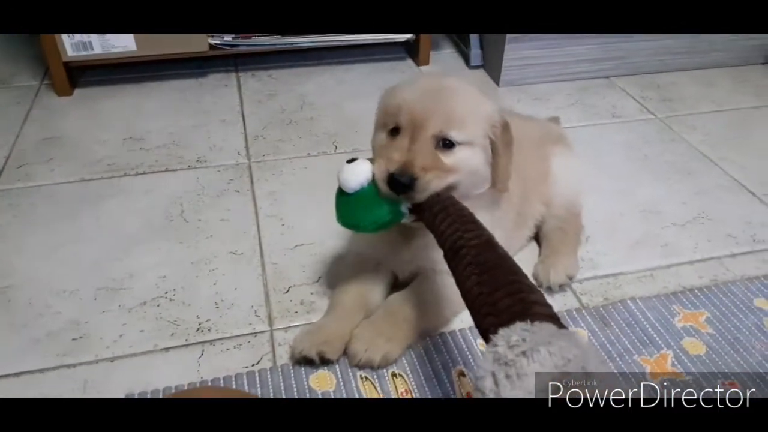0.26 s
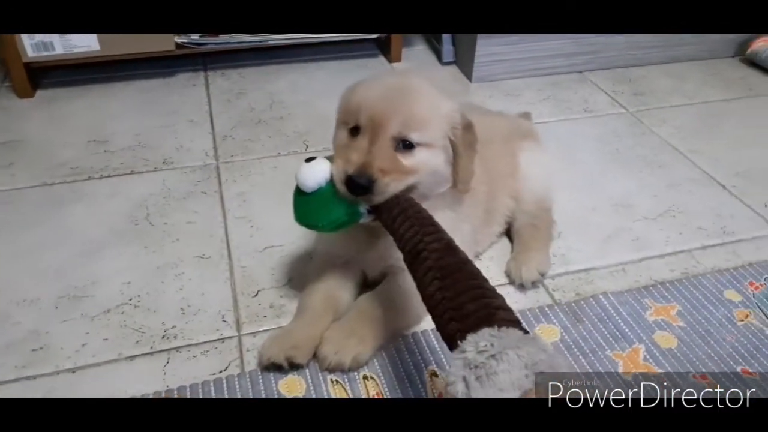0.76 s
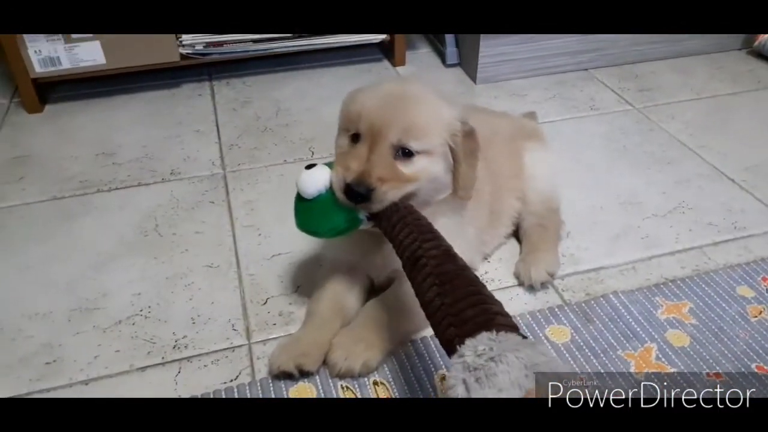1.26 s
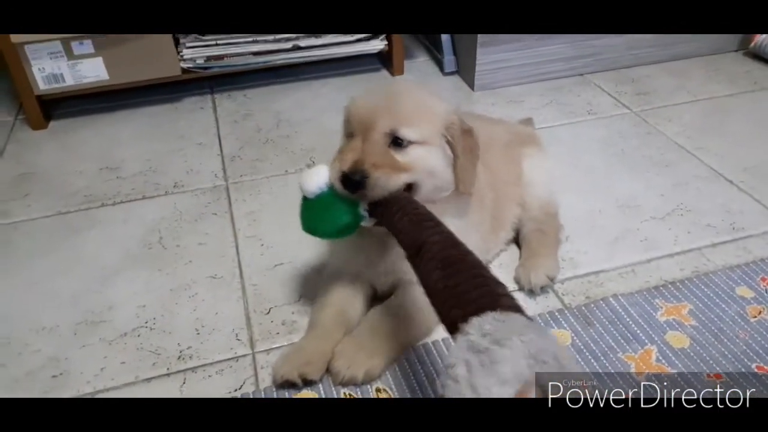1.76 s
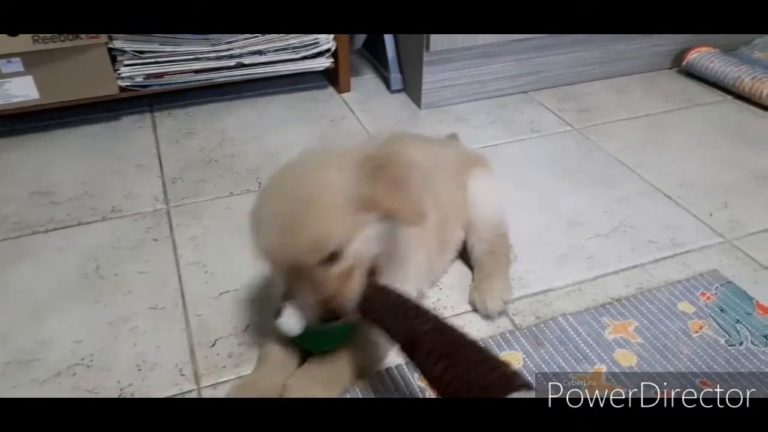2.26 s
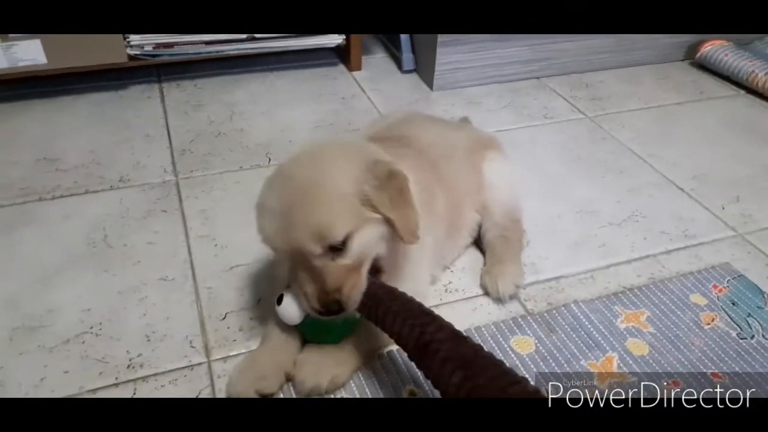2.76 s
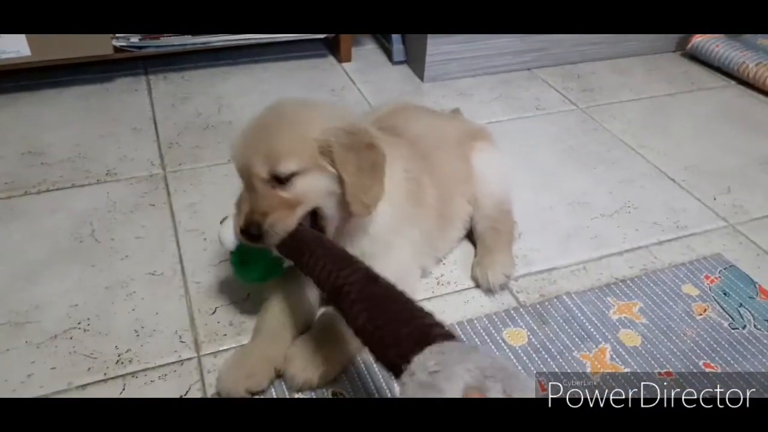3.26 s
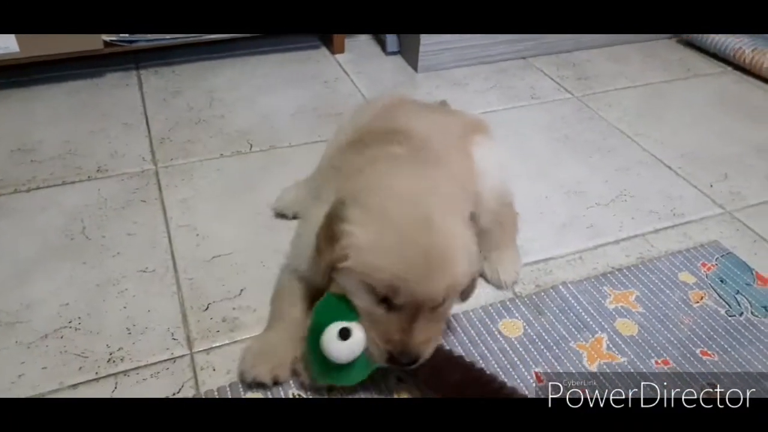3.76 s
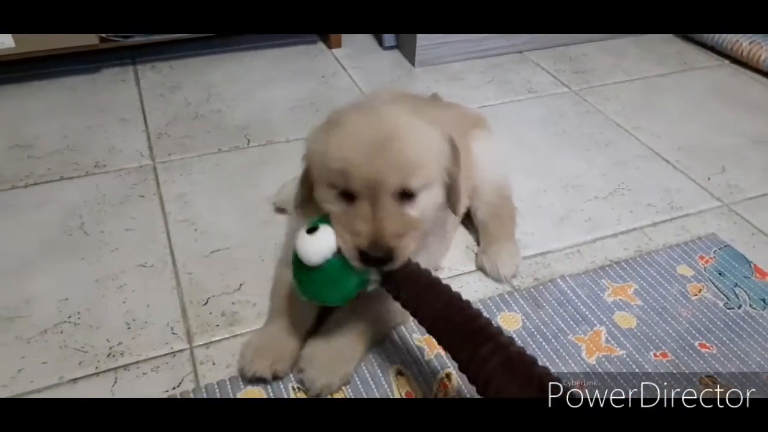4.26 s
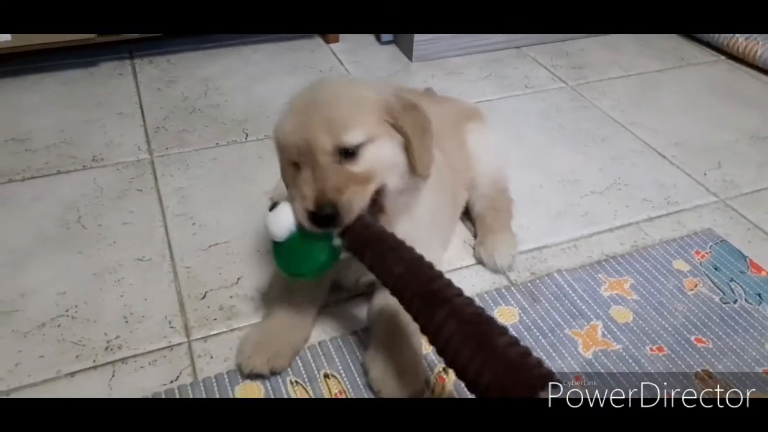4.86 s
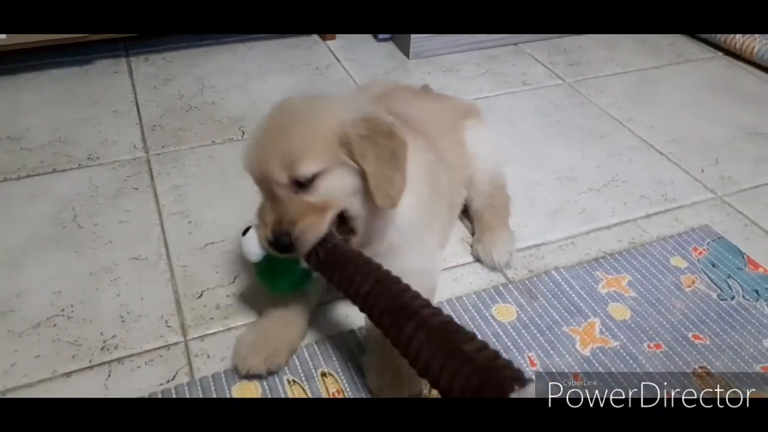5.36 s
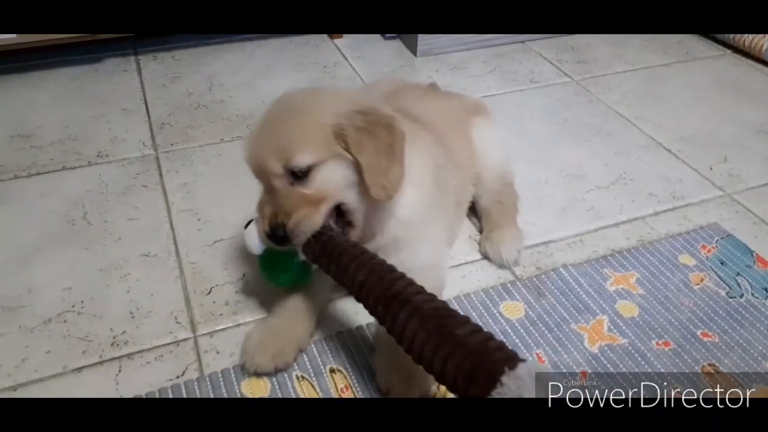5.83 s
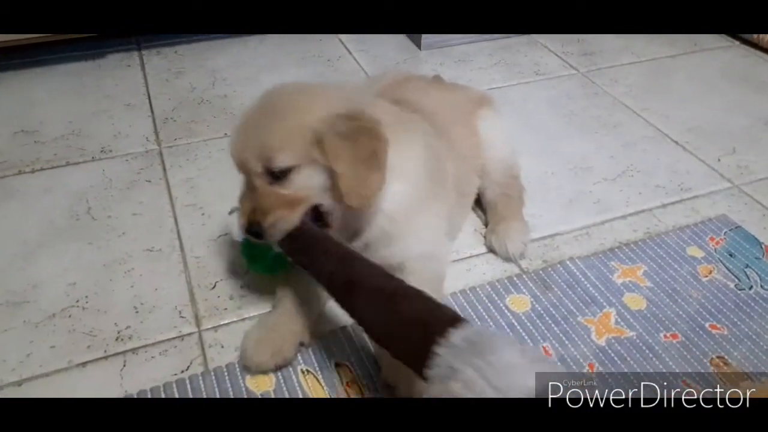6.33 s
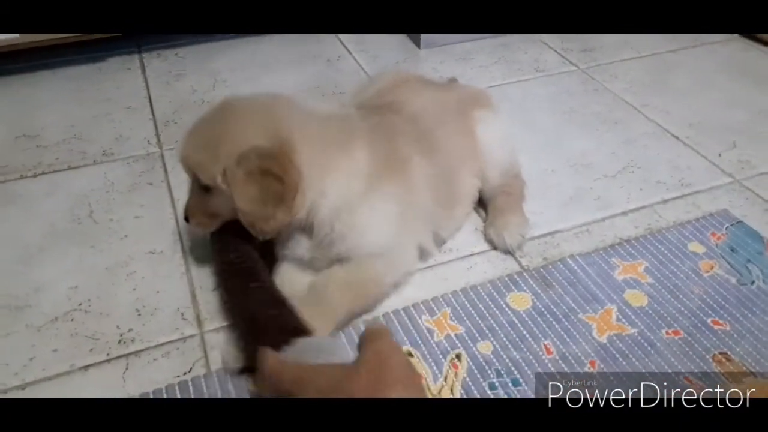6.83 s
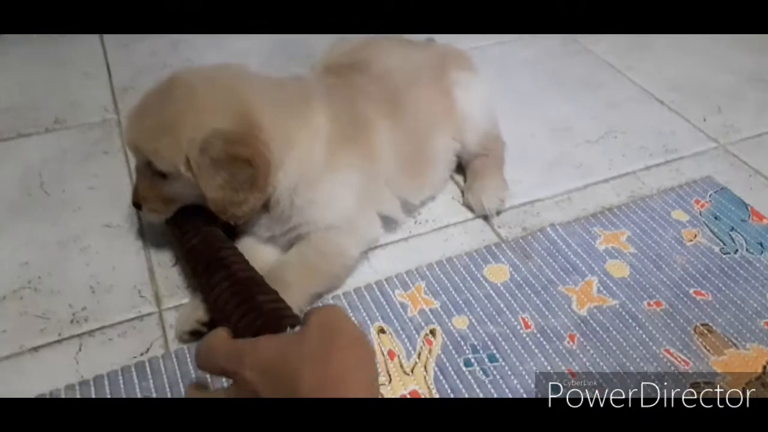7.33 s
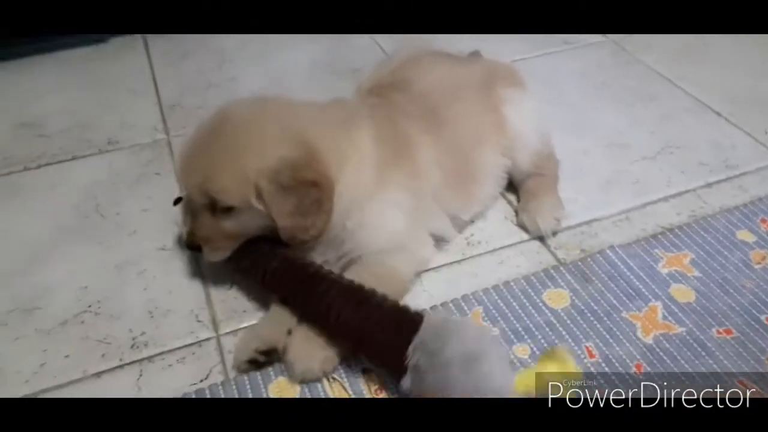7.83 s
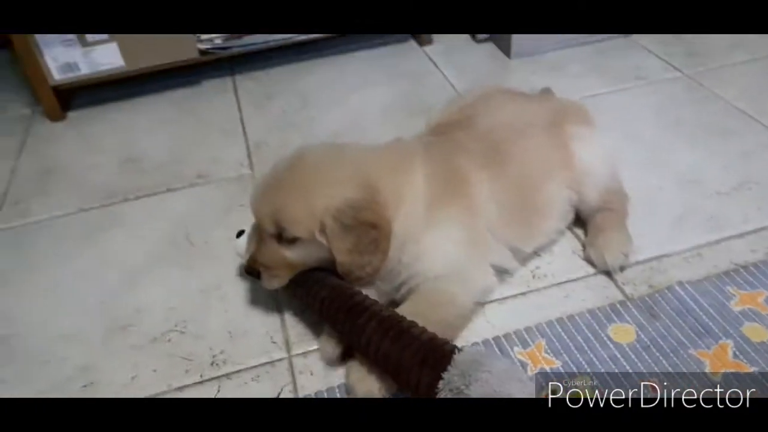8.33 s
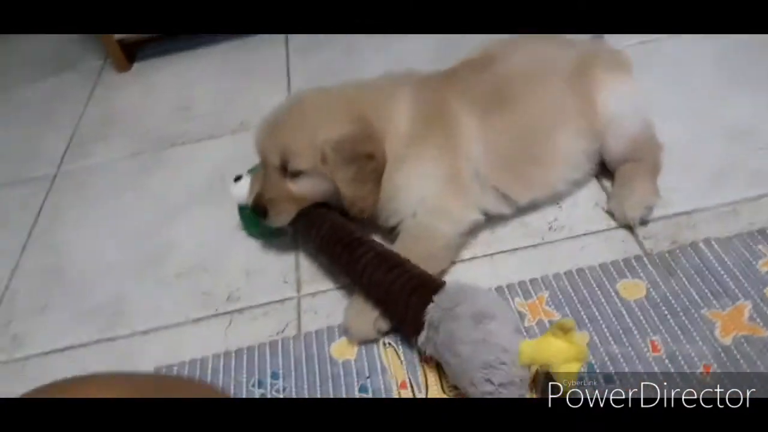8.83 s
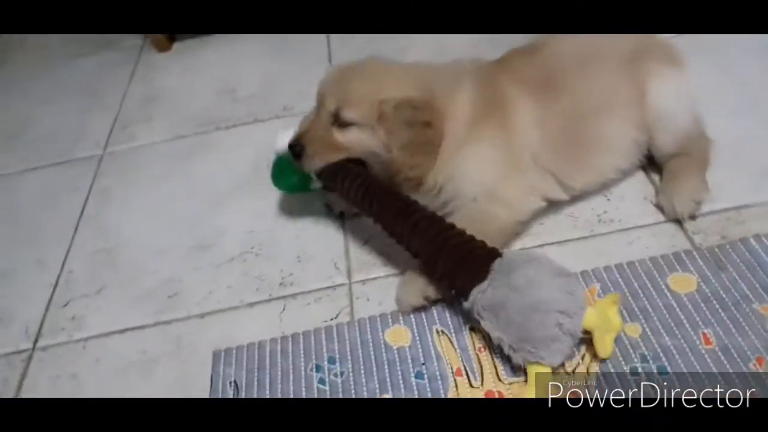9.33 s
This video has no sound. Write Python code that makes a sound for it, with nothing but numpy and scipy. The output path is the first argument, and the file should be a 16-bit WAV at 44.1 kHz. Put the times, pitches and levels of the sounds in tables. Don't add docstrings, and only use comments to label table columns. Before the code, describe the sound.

A squeaky plush toy chirps in alternating high and hoarse squeaks in a tiled room, then stops, leaving a low fan drone and faint rustles.

```python
import sys
import numpy as np
from scipy import signal
from scipy.fft import rfft, irfft, next_fast_len
from scipy.io import wavfile
from scipy.ndimage import uniform_filter1d, map_coordinates

SR = 44100
rng = np.random.default_rng(int(sys.argv[2]) if len(sys.argv) > 2 else 0)


def store_wav(level_fs):
    pcm = np.round(np.clip(np.atleast_2d(level_fs), -1, 1) * 32767)
    wavfile.write(sys.argv[1], SR, pcm.T.astype(np.int16))


def boost(x):
    u = np.asarray(x, float) / 20
    return 10 ** u


N = 422919
LIFT_HZ = 1020


def unit(x):
    return x / np.sqrt(np.mean(x ** 2) + 1e-20)


def along(points, hz):
    f, v = np.transpose(points)
    return np.interp(np.log(hz + 1), np.log(f + 1), v)


def wobble(rate, size=N):
    coarse = np.arange(0, size + 16, 16)
    knots = rng.standard_normal(size // 20 + 8)
    curve = map_coordinates(knots, [coarse * min(rate, 2000) / SR])
    return np.interp(np.arange(size), coarse, curve)


def filtered(x, response):
    m = next_fast_len(x.shape[-1] + 4096)
    spectrum = rfft(x, m) * response(np.fft.rfftfreq(m, 1 / SR))
    return irfft(spectrum, m)[..., :x.shape[-1]]


def pair(spectrum):
    # f/Hz, likeness (-1 to 1)
    likeness = [(60, 0.84), (180, 1), (550, 0.37), (1650, -0.15), (4970, 0.052), (15000, -0.22)]

    def split(hz):
        angle = np.arccos(np.clip(along(likeness, hz), -1, 1)) / 2
        return boost(along(spectrum, hz)) * [np.cos(angle), np.sin(angle)]

    mid, side = filtered(rng.standard_normal((2, N)), split)
    return unit(np.array([mid + side, mid - side]))


def release(s, length, top_hz, db, lost):
    seat_hz, gentle_hz = 932.4, 1008.6
    straight = 0.38
    seated_slap_db, free_slap_db = -0.6, -11
    u = np.linspace(0, 1, num=33)
    top = .57 + 0.001083 * (top_hz - gentle_hz)
    rise = np.clip(u / top, 0, 1)
    fall = np.clip((u - top) / (1 - top), 0, 1)
    pull = straight * rise + (1 - straight) * rise ** 2 * (3 - 2 * rise) - lost * fall ** 2.15
    start_hz = min(seat_hz, top_hz - 40)
    hz = start_hz + (top_hz - start_hz) * pull
    free = 1 / (1 + np.exp((LIFT_HZ - hz) / 14))
    seated_db = min(-25.5, db)
    slap_db = seated_slap_db + (free_slap_db - seated_slap_db) * free
    slap_db = slap_db + 1.5 * (seated_db + 25.5)
    return np.transpose([s + u * length, hz, seated_db + (db - seated_db) * free, slap_db])


def squeeze(s, length, top_hz, db, top):
    lightest_hz = 1288.4
    catch_s, stop_s = 0.0035, 0.0047
    u = np.linspace(0, 1, num=33)
    catch = np.exp(-u * length / catch_s)
    stop = np.exp((u - 1) * length / stop_s)
    sag = (1 - lightest_hz / top_hz) * (3.02 * (u - top) ** 2 + 0.88 * stop)
    hz = top_hz * (1 - 0.035 * catch - sag)
    low_db = db + 6 * catch - 45 * sag
    slap_db = 3.5 - 6.5 * catch - 38 * sag
    return np.transpose([s + u * length, hz, low_db, slap_db])


def reed(rows, tube, grip, jitter, breath_db, chirp, rise, fall, split_hz, inward):
    s, *cols = np.transpose(rows)
    t = np.arange(s[0], s[-1] + fall / 2, 1 / SR)
    hz, low_db, slap_db = [uniform_filter1d(np.interp(t, s, c), 132, mode="nearest") for c in cols]
    sag = chirp * (np.exp((s[0] - t) / 0.0015) + 0.78 * np.exp((t - t[-1]) / 0.0025))
    hz = hz * (1 - sag) * (1 + jitter * wobble(704, size=len(t)))
    lift = inward / (1 + np.exp((LIFT_HZ - hz) / 14))

    k = np.arange(1, 19)[:, None]
    first, third, fourth, top_db, _ = grip
    shade = first * (k == 1) + third * (k == 3) + fourth * (k == 4) + top_db * (k * hz > 10200)
    flicker_db = 1.8 + inward * np.minimum(k / 2, 4) * (0.4 + 0.63 * lift)
    flicker = flicker_db * np.array([wobble(124, size=len(t)) for _ in k])
    shade = shade + 8 * lift * (k == 1) + flicker
    gain = boost(along(tube, k * hz) + shade) * (k * hz < SR * .4)

    high = 1 / (1 + (split_hz / (k * hz)) ** 20)
    norm = lambda g: g / np.sqrt(np.sum(g ** 2, 0) / 2)
    gain = norm(gain * (1 - high)) + boost(slap_db - 9 * lift) * norm(gain * high)

    phase = 2 * np.pi * np.cumsum(hz) / SR
    spread = .45 * k ** 2 + rng.normal(0, .3, k.shape)
    tone = np.sum(gain * np.sin(k * phase + spread), 0)
    breath = lambda f: boost(along(tube, f) / 2 + 1.5 * top_db * (f > 11500)) * (f > 2000)
    hiss = unit(filtered(rng.standard_normal(len(t)), breath))
    hiss = boost(breath_db + 5.5 * lift) * hiss * (1 + np.sin(phase))
    edge = np.clip((t - s[0]) / rise, 0, 1) * np.clip((t[-1] - t) / fall, 0, 1)
    return boost(low_db) * edge * (tone + hiss)


def tiles(x, left_db, early_db, late_db):
    # f/Hz, t60/s
    ring = [(800, 0.43), (2100, 0.36), (5600, 0.37), (12000, 0.23)]
    # f/Hz, level/dB
    far_shade = [(1000, 0.5), (1400, -9), (2400, -17.5), (4400, -8), (8000, -13), (15000, -1.5)]
    # f/Hz, phase/rad
    far_lead = [(1000, -1), (1550, -1.46), (2600, 1.7), (3500, 0.3), (5900, -2), (7300, -1.5), (8400, -1),
                (10700, -3.5), (12000, -5), (15000, -4.5)]
    x = np.pad(x, (0, SR // 2))
    hz, t, z = signal.stft(rng.standard_normal((2, SR // 2)), SR, nperseg=256)
    decay = boost(-60 * t / along(ring, hz)[:, None])
    tail = signal.istft(z * decay, SR, nperseg=256)[1][:, :SR // 2]
    onset = np.clip(np.arange(SR // 2) / SR / .01, 0, 1)
    tail *= boost(late_db) / np.linalg.norm(tail[0]) * onset
    tail[[[0], [1]], rng.integers(40, 700, (2, 6))] += boost(early_db) * rng.standard_normal((2, 6))
    left = filtered(x, lambda f: boost(along(far_shade, f) + left_db) * np.exp(1j * along(far_lead, f)))
    room = signal.fftconvolve(x[None], tail, axes=1)[:, :len(x)]
    return np.array([left, x]) + boost([[-5], [0]]) * room


def squeaker():
    # t/s, length/s, top pitch f/Hz, level/dB, share of the length before the hardest press (0-1)
    squeezes = [
        (0.197, 0.066, 1366, -20.5, 0.5),
        (0.627, 0.065, 1366, -19, 0.43),
        (1.085, 0.057, 1424, -16, 0.56),
        (1.818, 0.058, 1397, -18.5, 0.4),
        (3.374, 0.085, 1328, -19, 0.7),
        (4.213, 0.084, 1367, -21, .38),
        (4.871, 0.078, 1451, -16, .49),
        (5.47, 0.074, 1376, -20, 0.6),
        (6.049, 0.085, 1383, -20.5, .48),
    ]
    # t/s, length/s, top pitch f/Hz, level/dB, share of the climb lost at the end
    releases = [(-0.06, .055, 1195, -26, 0.51), (0.361, 0.053, 1196, -18.5, 1.43),
                (0.793, 0.059, 1138, -19, 1.5), (1.26, .059, 1207, -19, 1.27),
                (1.989, 0.056, 1200, -21.5, 1.66), (2.65, 0.011, 890, -30, 1.7),
                (3.705, 0.048, 1088, -20, 0.84), (4.387, .071, 1086, -19.5, 1.05),
                (5.142, 0.087, 1049, -21.5, 0.42), (5.666, 0.082, 1037, -21.5, 0.5),
                (6.245, 0.078, 1078, -22, 0.58)]
    # f/Hz, level/dB
    out_tube = [(1200, -0.5), (2700, 0), (4100, -3), (5500, -1), (6900, 0.5), (8200, -2.5), (9600, -9),
                (11000, -14.5), (12300, -25.5), (13700, -32), (15200, -28)]
    # f/Hz, level/dB
    in_tube = [(850, -9.5), (970, -1), (1050, -0.5), (1150, -3), (2100, 0), (3200, -2), (4200, -11),
               (5600, -12.5), (7000, -5), (8600, 3.5), (10000, -6.5), (13000, -20), (16000, -34)]
    # t/s, toy turned away (0 facing, about 1 fully away), palm cupped round it level/dB
    pose = [
        (0, 0, 1),
        (1.1, 0.08, -0.5),
        (2, 0.13, -0.7),
        (3.4, .3, -2.5),
        (4.3, 1.15, -3),
        (4.9, 0.93, 2.5),
        (5.6, 0.83, 4),
        (6.2, 0.26, -3),
    ]
    # 1st, 3rd, 4th partial, top, left microphone [all dB]
    out_grip = (0.087, 0.32, -1.8, -0.59, 1.6)
    in_grip = (1.9, -4, 1.5, 3, -2)
    out_turn = (-4, 0.9, 1.3, 0.5, -3)
    in_turn = (-6.5, .5, 2, -3.5, -3.5)
    out_cup = (0.3, 1, 0.28, 0.12, 0.11)
    in_cup = (-0.044, -0.19, 0.91, -.2, 0.089)
    at, away, cup_db = np.transpose(pose)

    def hold(s, grip, turned, cupped):
        shade = grip + np.interp(s, at, away) * np.array(turned) + np.interp(s, at, cup_db) * np.array(cupped)
        return shade + 1.04 * rng.standard_normal(5)

    breaths = []
    for row in squeezes:
        grip = hold(row[0], out_grip, out_turn, out_cup)
        sound = reed(squeeze(*row), out_tube, grip, jitter=.0005, breath_db=-44, chirp=0.15,
                     rise=0.0052, fall=0.0087, split_hz=4220, inward=0)
        breaths.append((row[0], grip, sound))
    for row in releases:
        grip = hold(row[0], in_grip, in_turn, in_cup)
        sound = reed(release(*row), in_tube, grip, jitter=0.006, breath_db=-18, chirp=0.015,
                     rise=0.0056, fall=0.0017, split_hz=6900, inward=0.64)
        breaths.append((row[0], grip, sound))

    lead = SR // 10
    out = np.zeros((2, lead + N + SR))
    for s, grip, sound in breaths:
        heard = tiles(sound, grip[-1], early_db=-20, late_db=-8.5)
        out[:, lead + round(s * SR):][:, :heard.shape[1]] += heard
    return out[:, lead:lead + N]


def fans():
    blade_tones = [287.6, 294.0]
    overtones = [(-1, -18.5, -21.5, -23), (-10, -28.5, -22, -39)]
    # f/Hz, width/Hz, level/dB
    casing = (354, 62, -9)
    t = np.arange(N) / SR - 2.02
    hz, width, db = casing
    sound = boost(db) * pair([(hz - 3 * width, -30), (hz - width, -6), (hz, 0),
                            (hz + width, -6), (hz + 3 * width, -30)])
    for blade_hz, levels in zip(blade_tones, overtones):
        for k, db in enumerate(levels, 1):
            waver = 0.45 * k * wobble(2.49) + 0.13 * np.array([[1], [-1]])
            gain = boost(db + 3.5 + 2.03 * wobble(2.896))
            sound += gain * np.cos(2 * np.pi * k * blade_hz * t + waver)
    return unit(sound)


def background():
    # t/s, level/dB
    drone = [
        (0, -43.5),
        (.85, -42.5),
        (1.95, -45.5),
        (3.5, -42),
        (4.46, -42.5),
        (5.34, -44.5),
        (6.8, -44),
        (8.5, -40.5),
        (9.59, -40),
    ]
    # f/Hz, level/dB per Hz
    air_colour = [(41, -33), (70, -18.5), (108, -11.5), (155, -16), (233, -11.5), (293, -1), (451, -10.5),
                  (900, -15), (2370, -18.5), (3300, -30), (4200, -37.5), (9000, -39.5), (11000, -89),
                  (16000, -59)]
    # f/Hz, level/dB
    hum = [(100, -47.5), (200, -57), (300, -79), (700, -68.5), (900, -62.5)]
    # f/Hz, level/dB
    lean = [(60, 1), (150, -3.5), (380, -2.5), (950, -1.5), (2380, -7), (5980, -6.5), (15000, 2.5)]
    t = np.arange(N) / SR
    s, drone_db = np.transpose(drone)
    air_db = -50 + 0.51 * (drone_db - drone_db.mean())
    mains = sum(boost(db - 0.5) * np.sin(2 * np.pi * hz * t) for hz, db in hum)
    mains = boost(0.58 * wobble(4.6)) * mains
    air = boost(np.interp(t, s, air_db) + 7.5 + 0.22 * wobble(3.03)) * pair(air_colour)
    room = boost(np.interp(t, s, drone_db) + 2.0) * fans() + mains + air
    return filtered(room, lambda hz: boost(along(lean, hz) * np.array([[.5], [-.5]])))


def moves(rows, rest_db):
    t = np.arange(0, N + 64, 64) / SR
    power = boost(rest_db) ** 2
    for s, fade, db in rows:
        power = power + boost(db - 10.5 * np.abs(t - s) / fade) ** 2
    return np.interp(np.arange(N) / SR, t, np.sqrt(power))


def handling():
    # t/s, time to fade/s, hiss level/dB, scuff over it level/dB
    drags = [(2.16, .05, -61, 4), (2.36, .08, -63, -8), (2.6, .06, -66, 7), (2.776, 0.034, -65, 9),
             (3.07, .15, -67, 3), (3.21, .04, -68, 8), (3.4, 0.45, -61.5, 6), (6.94, .05, -74, 9),
             (7.0, 0.041, -76, 19), (7.14, .08, -65, -8), (7.32, 0.044, -61, -2), (7.48, 0.14, -62, 6),
             (8.11, 0.27, -60, -34), (8.31, 0.036, -68, 13), (8.4, 0.092, -56, -7), (8.71, 0.037, -67, 14),
             (8.9, 0.28, -57, 6), (9.165, 0.14, -46.5, -1.5), (9.59, .1, -69, 7)]
    # f/Hz, level/dB per Hz
    plush = [(1760, -30), (3000, 2), (8000, -6.5), (8950, -3.5), (11000, -18.5), (16000, -20)]
    # f/Hz, level/dB per Hz
    mat = [(1000, -26), (1700, 7), (2300, 4), (3300, -5), (4200, -30)]
    # t/s, time to fade/s, level/dB
    shifts = [
        (2.27, .15, -59),
        (2.54, .1, -57),
        (2.83, .18, -53),
        (3.12, 0.16, -46),
        (3.5, 0.087, -51.5),
        (6.2, .18, -62),
        (7.88, .3, -66),
        (9.13, 0.11, -51),
        (9.5, .5, -62),
    ]
    # f/Hz, level/dB per Hz
    rumble = [(15, -45), (30, -19), (55, -0.5), (80, -1), (140, -1), (250, -66)]
    # t/s, peak level/dB, f/Hz
    bumps = [
        (3.168, -43, 70),
        (6.2, -35, 70),
        (9.129, -32, 70.4),
    ]
    hiss = moves([(s, fade, db) for s, fade, db, _ in drags], -67)
    scuff = moves([(s, fade, db + over) for s, fade, db, over in drags], -64)
    sound = hiss * boost(3.0 + 0.99 * wobble(60)) * pair(plush)
    sound += scuff * boost(2.0 + 3.4 * wobble(90) + [[-3], [3]]) * pair(mat)
    ports = filtered(rng.standard_normal((2, N)), lambda hz: boost(along(rumble, hz)))
    sound += moves(shifts, -65.5) * boost([[-1], [3]]) * unit(ports)
    u = np.arange(SR // 8) / SR
    for s, db, hz in bumps:
        thud = u / .012 * np.exp(-u / 0.0067) * np.sin(2 * np.pi * hz * u)
        sound[:, round(s * SR):][:, :len(u)] += boost(db + 8 + np.array([[-6], [3]])) * thud
    return sound


def scene():
    return squeaker() + background() + handling()


def roll_off(x):
    return signal.sosfilt(signal.butter(12, 16640, fs=SR, output="sos"), x)


def record(dry):
    dry = dry / (1 + np.abs(dry / .85) ** 4) ** .25
    mix = filtered(dry, lambda hz: 1 / (1 + (hz / 15450) ** 120))
    return roll_off(mix)


dry = scene()
out = record(dry)
store_wav(out)
```